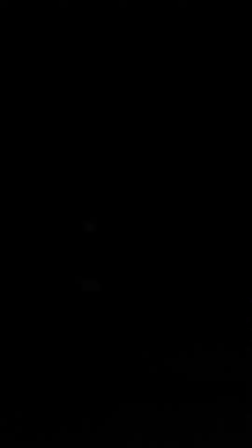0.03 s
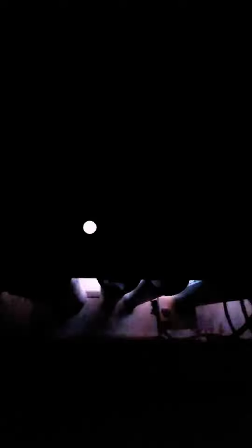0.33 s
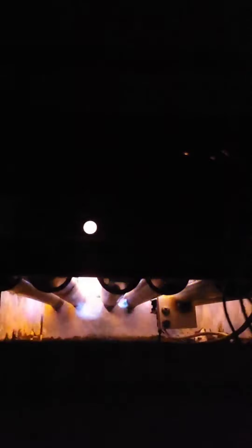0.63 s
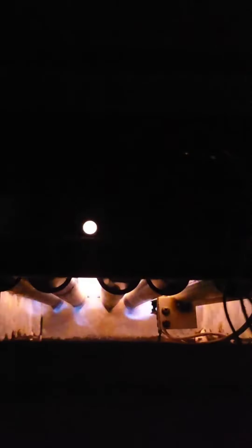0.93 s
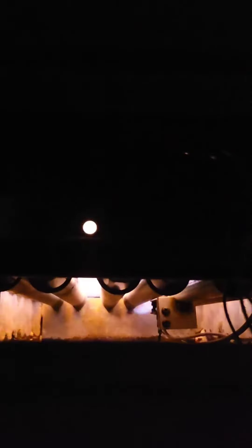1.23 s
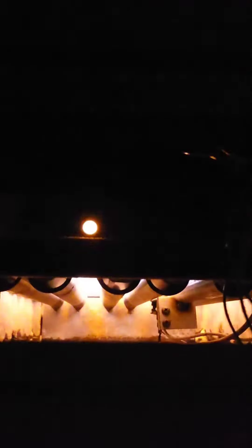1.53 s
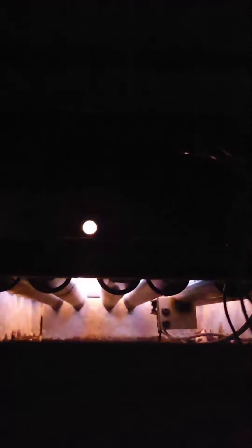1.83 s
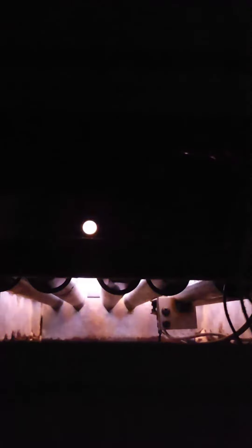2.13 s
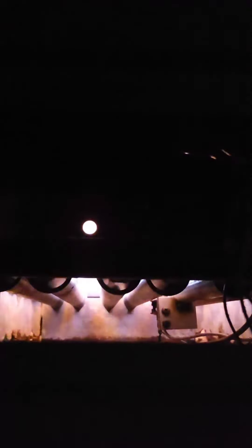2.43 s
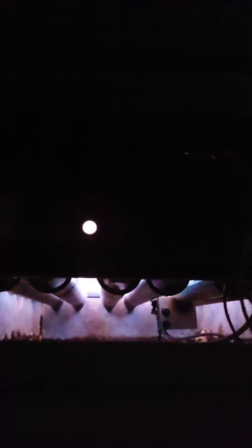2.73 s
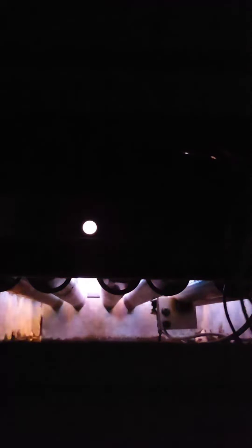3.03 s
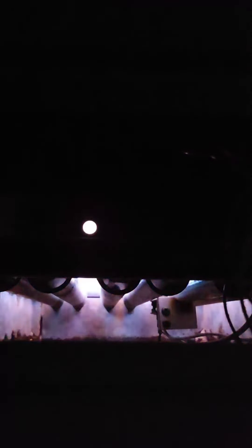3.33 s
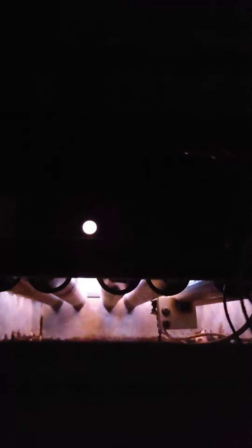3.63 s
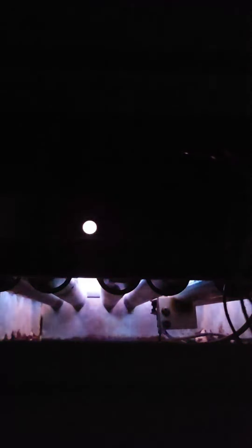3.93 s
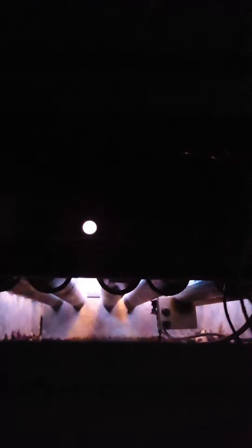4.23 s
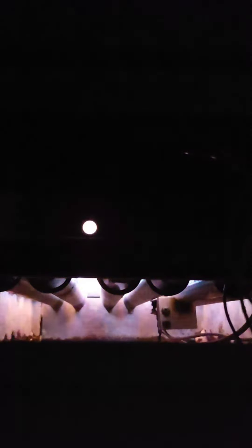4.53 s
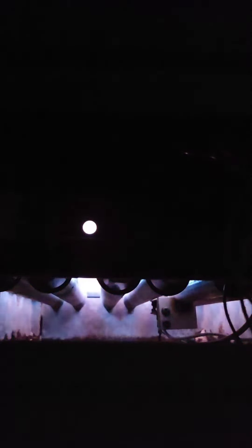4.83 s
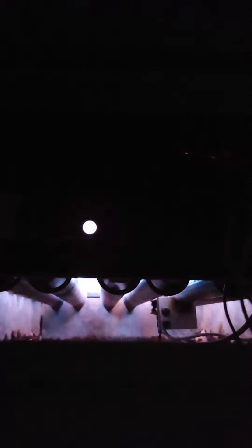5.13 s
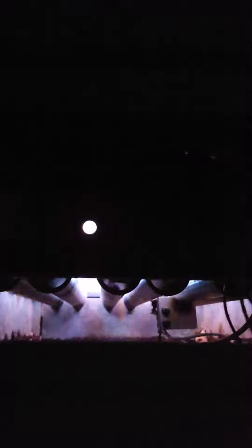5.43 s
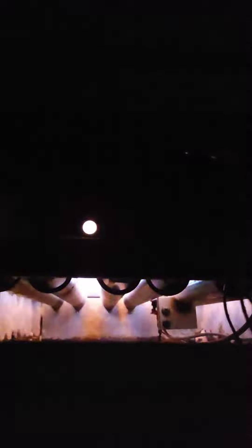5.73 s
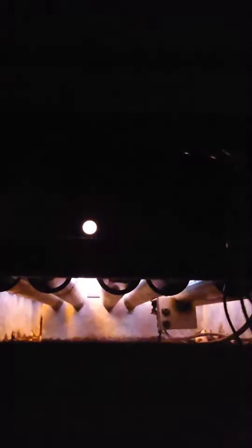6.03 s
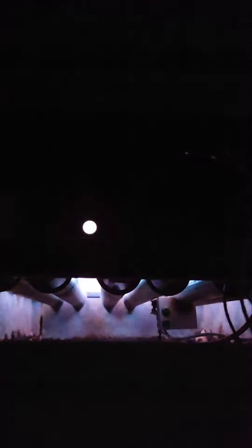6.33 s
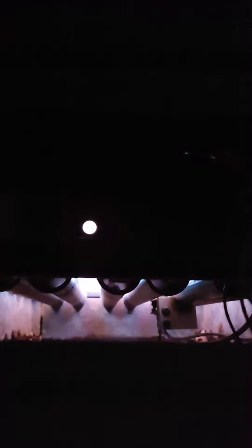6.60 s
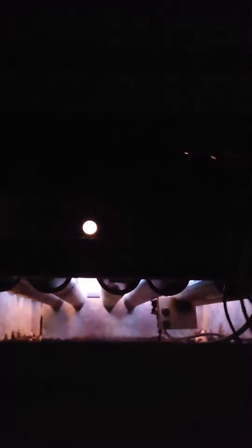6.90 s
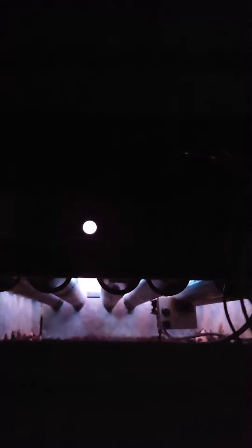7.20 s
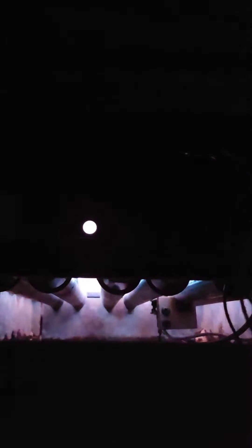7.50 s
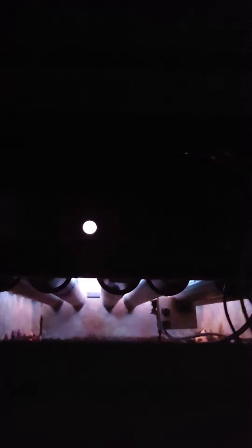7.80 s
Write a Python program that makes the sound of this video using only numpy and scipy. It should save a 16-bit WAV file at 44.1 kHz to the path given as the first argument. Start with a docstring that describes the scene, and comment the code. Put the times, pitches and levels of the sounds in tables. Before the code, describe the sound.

Close to the burners inside a gas boiler, a crisp valve click starts a thin hiss. The gas lights with a soft, low puff amid a few small, bright igniter ticks. After a short dip, the fire builds to a deep, even roar that flutters and now and then swells for a moment. The faint hiss of the jets and a very faint, high valve buzz carry on throughout.

```python
"""A gas boiler's flame catches with a soft whoomph, sinks, then settles to a low fluttering roar.
Turbulent combustion is a broadband source, filtered by the resonances of firebox and flue.
Just before it lights, a solenoid valve snaps open and buzzes at twice the mains frequency, and gas
hisses from the jets. The igniter ticks five times as the flame takes hold.
A draught murmurs in the flue. All is heard close to the open burner tray."""
import sys
import numpy as np
from scipy import signal
from scipy.fft import rfft, irfft
from scipy.io import wavfile
from scipy.ndimage import uniform_filter1d

SR = 44100
rng = np.random.default_rng(int(sys.argv[2]) if len(sys.argv) > 2 else 0)


def put_to_file(sound):
    """Save the sound as 16-bit audio at rate SR, in the file named by the first command-line argument."""
    columns = np.atleast_2d(sound).T  # one column per channel
    safe = np.clip(columns, -1, 1)
    whole_steps = np.round(safe * 32767)
    wavfile.write(sys.argv[1], SR, whole_steps.astype(np.int16))


N = 346626
T = np.arange(N) / SR
HZ = np.fft.rfftfreq(N, 1 / SR)


# Flame strength, small at first and growing as the flue draws: t/s, relative level/dB
FLAME_GROWTH = [(.22, -24), (.35, -18), (.6, -6), (.92, -13.5), (1.1, -8), (1.25, -3), (2.0, -0.4),
                (3.1, 0.5), (3.9, 1.2), (4.55, -0.6), (5.75, -1), (6.5, 0), (7.1, -0.5), (7.86, -0.5)]
# Spectrum of combustion noise: f/Hz, relative level/dB
COMBUSTION_SPECTRUM = [(20, -40), (35, -34), (54, -11), (100, -8.5), (168, -4.5), (200, -21), (260, -27.5),
                       (400, -25.5), (440, -37), (520, -40), (950, -46.5), (1030, -46.5), (1900, -50),
                       (3200, -70.5)]
# Level difference of the flame, left minus right: f/Hz, level/dB
FLAME_BALANCE = [(58, 1), (80, 6), (110, 2), (160, 0.5), (185, 10), (215, -2), (245, 12.5), (272, -9),
                 (320, 1), (600, 1.5), (900, 0.5), (1400, -8), (2500, 1.5)]
# Coherence of left and right: f/Hz, coherence/1
FLAME_COHERENCE = [(30, 1), (60, 0.98), (160, .99), (215, 0.97), (280, 1), (450, 0.84), (540, 0.59),
                   (700, 0.82), (1200, 1), (2500, 1)]
# Phase lead of left over right: f/Hz, phase/rad
FLAME_PHASE = [(40, .25), (110, 0.27), (200, 0.37), (260, 0.098), (400, 0.44), (650, 0.71), (1030, 1.5),
               (1300, 2.57), (1720, 5.12)]
def flame(lights_s=0.222, onset_s=0.027, swell_s=0.14, rumble_db=-28.5, roar_db=-21, rush_db=-35):
    """Turbulent combustion drives the firebox; each band grows as a power of the flame's strength."""
    balance_db = spectrum(FLAME_BALANCE) * np.array([[0.5], [-0.5]])
    fire_db = spectrum(COMBUSTION_SPECTRUM) + firebox() + balance_db
    fire = rfft(noise(fire_db, spectrum(FLAME_COHERENCE), spectrum(FLAME_PHASE)))
    below_roar = 1 / (1 + (HZ / 95) ** 16)
    below_rush = 1 / (1 + (HZ / 215) ** 16)
    burning = envelope(FLAME_GROWTH)
    rumble_flare, roar_flare = np.sqrt(flares())
    # steady burning and flare-ups add in power
    rumble = np.hypot(amp(rumble_db) * burning ** 0.81, rumble_flare)
    roar = np.hypot(amp(roar_db) * burning ** 0.98, roar_flare)
    rush = np.hypot(amp(rush_db) * burning ** 0.68, amp(-15) * rumble_flare)
    out = hum()
    for passband, gain in (below_roar, rumble), (below_rush - below_roar, roar), (1 - below_rush, rush):
        band = irfft(fire * passband, N)
        # dividing by the running rms keeps the fast flutter; the slow swell follows the flame
        out += gain * band / running_rms(band, swell_s)
    return out * np.clip((T - lights_s) / onset_s, 0, 1)


# Flare-ups, as the burners catch in turn and now and then later:
# t/s, hold/s, rumble level/dB, roar level/dB
FLARE_UPS = [(0.244, 0.011, -34, -42), (0.38, .02, -50, -26), (0.448, .03, -21, -21.5),
             (0.543, 0.05, -19, -19.5), (0.707, 0.014, -27.5, -15), (1.228, 0.026, -29, -20.5),
             (1.814, 0.014, -47, -16.5), (2.29, 0.082, -39, -19), (2.7, 0.026, -42, -16),
             (3.088, 0.15, -23.5, -25.5), (3.523, 0.28, -26, -24.5), (4.176, 0.12, -30, -19),
             (5.035, 0.074, -26, -18.5), (6.226, 0.17, -32, -19)]
def flares(rise_s=0.023, fall_s=0.022):
    """Incoherent sources add in power: the flare-ups' total, for the rumble and for the roar."""
    return sum(burst(s, hold_s, rise_s, fall_s, [[rumble_db], [roar_db]]) ** 2
               for s, hold_s, rumble_db, roar_db in FLARE_UPS)


# Resonances of firebox and flue: f/Hz, width/Hz, level/dB
FIREBOX_MODES = [(55.3, 11, 4), (115, 21.7, 4.5), (143.9, 25.2, 7.5), (272.4, 12.6, 12.5), (298.2, 18.2, 9),
                 (325.6, 15.5, 6.5), (361, 11.6, 9), (400.5, 34, 7), (463, 40, 8.5), (593, 29, 8.5),
                 (716.5, 65, 9.5), (822.5, 44, 8.5), (908, 141, 10), (1157, 98, 7), (1722, 44, 6.5)]
# Interference in the casing, mostly nulls: f/Hz, width/Hz, level/dB
CASING_NULLS = [(285.6, 4, -15), (495, 5.1, 2), (530, 31, -21), (790, 13, -13), (1043, 36, -14),
                (1300, 44, -3), (1610, 120, -6.5)]
def firebox():
    """Cavity response in dB: standing waves give peaks, destructive interference gives dips."""
    return bells(FIREBOX_MODES) + bells(CASING_NULLS)


# The firebox resonance that hums: f/Hz, width/Hz, level/dB
HUM_MODE = [(267, 75, 58)]
def hum():
    """A noise-driven resonance hums while the firebox is cold and fades as it warms."""
    gain = burst(s=0.58, hold_s=2.8, rise_s=0.078, fall_s=2.9, db=-40.5)
    hum_db = bells(HUM_MODE) - 40 * np.log10(1 + HZ / 500)
    return gain * noise(hum_db, coherence=1) * amp([[-1.5], [1.5]])


# Spectrum of the flame front: f/Hz, relative level/dB
FRONT_SPECTRUM = [(250, -13), (420, 2.5), (600, -3.5), (900, -10), (1100, -5.5), (1600, -14), (2100, -31),
                  (4000, -40)]
# Spectrum of the puff: f/Hz, relative level/dB
PUFF_SPECTRUM = [(120, -34), (195, 1), (240, 11), (275, -1), (320, -18), (500, -52)]
def whoomph():
    """Deflagration: a hollow flare runs along the burners and the gathered gas burns in one low puff."""
    lead = spectrum(FLAME_PHASE)
    front = noise(spectrum(FRONT_SPECTRUM) + firebox(), coherence=0.84, lead=lead)
    front *= burst(s=0.41, hold_s=0.08, rise_s=0.05, fall_s=0.08, db=-39)
    puff = noise(spectrum(PUFF_SPECTRUM), coherence=0.89, lead=lead)
    puff *= burst(s=0.458, hold_s=0.15, rise_s=0.052, fall_s=0.05, db=-27.5)
    return front + puff


# Flow through the open valve: t/s, jet hiss level/dB, drawn air level/dB
GAS_FLOW = [(.14, -48, -54), (.21, -51.5, -63), (.31, -44, -60.5), (.5, -42, -49), (.82, -45.5, -57),
            (1.3, -43.5, -50.5), (1.9, -43, -49.5), (4.6, -45, -52.5), (7.86, -44, -52)]
# Spectrum of the jets: f/Hz, relative level/dB
JET_SPECTRUM = [(1500, -24), (3200, -9), (4800, -3.5), (5400, 0), (6500, 1.5), (8300, -2), (9000, -1.5),
                (10600, -1.5), (11900, 3), (13000, 1), (14500, 0.5), (15500, -5.5)]
# Thin sizzle at the top of the hiss: f/Hz, width/Hz, level/dB
SIZZLE_PEAK = [(15600, 1100, 40)]
# Spectrum of the drawn air: f/Hz, relative level/dB
AIR_SPECTRUM = [(900, -10), (1500, 0), (2000, -2.1), (2600, 1.5), (3100, -3.5), (4500, -11), (7000, -47)]
# Resonances of the burner tubes: f/Hz, width/Hz, level/dB
TUBE_MODES = [(2016, 35, 6), (2300, 83, 3), (2733, 90, 7.5), (3640, 210, 5.1), (4110, 180, 8.4)]
def jets(fill_s=0.027, ripple_db=2.26, ripple_hz=60, whistle_hz=2040, waver_hz=1.67):
    """Turbulent gas jets hiss and entrain air into the burner tubes, one of which whistles faintly."""
    # reflections in the casing comb the hiss, differently on each side
    comb_bins = int(ripple_hz * N / SR) + 1
    comb_db = ripple_db * unit_rms(uniform_filter1d(rng.standard_normal((2, len(HZ))), comb_bins))
    lead = 2 * np.pi * HZ * 0.000338  # the right side hears it 0.338 ms later
    opened = np.clip((T - PLUNGER_IMPACTS[-1][0]) / fill_s, 0, 1)
    gas = opened * envelope(GAS_FLOW)
    draw = opened * envelope(GAS_FLOW, column=2)
    hiss = gas * noise(spectrum(JET_SPECTRUM) + comb_db, coherence=0.35, lead=lead)
    sizzle_gain = amp(-12 + 7 * np.exp(-T / 0.9)) * gas  # strongest as the gas starts
    sizzle = sizzle_gain * noise(bells(SIZZLE_PEAK) + comb_db, coherence=0.35, lead=lead)
    drift = unit_rms(uniform_filter1d(rng.standard_normal(N), size=3000))
    phase = 2 * np.pi * np.cumsum(whistle_hz + waver_hz * drift) / SR
    whistle = amp(-69.5) * unit_rms(np.sin(phase)) * unit_rms(draw)
    air = draw * noise(spectrum(AIR_SPECTRUM) + bells(TUBE_MODES) + comb_db, coherence=0.6, lead=lead)
    return shadow(hiss + sizzle, right_db=-25.5) + shadow(air, right_db=-21.5) + whistle


# The plunger lifts, then seats: t/s, relative level/dB, T60/s
PLUNGER_IMPACTS = [(0.0934, -6, 0.077), (0.1005, 5.5, 0.062)]
# Spectrum of the click: f/Hz, relative level/dB
CLICK_SPECTRUM = [(300, -18), (900, -16), (1300, -22), (2300, -19), (3300, -19), (4700, -7), (5600, 1),
                  (7900, 4), (9500, -3), (12500, -2), (15500, -2)]
# Modes of the valve body: f/Hz, width/Hz, level/dB
VALVE_MODES = [(2170, 280, 18), (2730, 220, 15), (5200, 220, 6), (6130, 210, 8), (7800, 330, 7),
               (9500, 260, 8), (10700, 240, 8), (11800, 470, 6), (12420, 240, 6), (13600, 240, 3)]
# Spectrum of the panels' dull ring: f/Hz, relative level/dB
PANEL_SPECTRUM = [(120, -18), (220, -5), (380, 3), (700, 0.5), (1100, -9.5), (1600, -11.5), (2300, -10),
                  (4000, -17.5)]
def valve(force_db=-7.5, room_db=-19, thud_db=-17.5):
    """Impact excitation: the plunger rings the valve body, the room reverberates and the panels thud."""
    snap, thud = np.zeros((2, 2, N))
    for s, db, t60 in PLUNGER_IMPACTS:
        add(snap, s, amp(db + force_db) * knock(tail_db=9.5, t60=t60))
    snap = shadow(snap, right_db=-10)
    room = signal.oaconvolve(snap[:1], knock(tail_db=7, t60=0.22), axes=1)[:, :N] / 2
    click = colour(snap + amp(room_db) * room, spectrum(CLICK_SPECTRUM) + bells(VALVE_MODES))
    add(thud, PLUNGER_IMPACTS[-1][0], amp(thud_db) * knock(tail_db=9, t60=0.18, size=24000))
    return click + colour(thud, spectrum(PANEL_SPECTRUM))


# Igniter discharges: t/s, relative level/dB
SPARK_TICKS = [(0.2928, -10), (.5685, -17), (0.8326, -12), (1.1245, -10.5), (1.3764, -13)]
# Spectrum of a spark: f/Hz, relative level/dB
SPARK_SPECTRUM = [(1500, -24), (4000, -13.5), (6000, -7), (9500, -9), (12500, 3), (15500, -1.5)]
def igniter(snap_db=2.5):
    """Each spark is an impulsive source: a tiny bright snap followed by brief reflections."""
    snaps = np.zeros((2, N))
    for s, db in SPARK_TICKS:
        add(snaps, s, amp(db + snap_db) * knock(tail_db=0, t60=0.035))
    return shadow(colour(snaps, spectrum(SPARK_SPECTRUM)), right_db=-16)


# Spectrum of the armature's chatter: f/Hz, relative level/dB
CHATTER_SPECTRUM = [(3000, -40), (5600, -8), (6700, -7), (7100, 14), (8400, 13), (9200, -9), (10100, -25),
                    (11500, -20), (12800, -2), (14300, -2), (15500, -3.5)]
def solenoid(chatter_hz=119.975, buzz_db=-55, force_spread=0.19, bounce_s=0.0015, bounce_gain=0.16):
    """Forced vibration: the armature strikes and bounces at each magnetic pull, two per mains cycle."""
    first_pull = np.ceil(PLUNGER_IMPACTS[-1][0] * chatter_hz)
    times = np.arange(first_pull, T[-1] * chatter_hz - 1) / chatter_hz
    force = 1 + force_spread * rng.standard_normal((len(times), 1))
    strikes = np.zeros(N)
    for delay, gain in (0, 1), (bounce_s, bounce_gain):
        position = (times[:, None] + delay) * SR
        near = position.astype(int) + np.arange(-10, 10)
        strikes[near] += gain * force * np.sinc(near - position)  # pulses fall between samples
    ringing = signal.oaconvolve(strikes[None], knock(tail_db=0, t60=0.045), axes=1)[:, :N]
    buzz = colour(ringing, spectrum(CHATTER_SPECTRUM))
    return shadow(amp(buzz_db) * unit_rms(buzz), right_db=-10)


# Spectrum of the flue draught: f/Hz, relative level/dB
DRAUGHT_SPECTRUM = [(25, -29), (70, -8.5), (110, 0.5), (135, -3.5), (175, -12), (250, -13), (320, -17.5),
                    (560, -21.5), (720, -29.5), (1100, -29.5), (1450, -46), (3000, -55), (12000, -42.5)]
def draught(db=-39):
    """Flow noise: air murmurs through the flue even with the burner off."""
    return amp(db) * noise(spectrum(DRAUGHT_SPECTRUM), coherence=1, lead=spectrum(FLAME_PHASE))


def amp(db):
    """Amplitude ratio of a level in decibels."""
    return 10 ** (np.asarray(db) / 20)


def unit_rms(x):
    """Normalisation to an rms of 1."""
    return x / np.sqrt(np.mean(x ** 2) + 1e-20)


def running_rms(x, width_s):
    """Short-time rms of the mean of both sides, under a Hann window width_s wide at half height."""
    window = np.hanning(int(2 * width_s * SR))
    power = signal.fftconvolve(x.mean(0) ** 2, window / window.sum(), "same")
    return np.sqrt(abs(power) + 1e-20)


def spectrum(points):
    """Interpolation of a frequency table on a logarithmic axis."""
    f, value = np.transpose(points)
    return np.interp(np.log(HZ + 1), np.log(f + 1), value)


def envelope(rows, column=1):
    """Amplitude envelope from one dB column of a time table."""
    columns = np.transpose(rows)
    return amp(np.interp(T, columns[0], columns[column]))


def burst(s, hold_s, rise_s, fall_s, db):
    """Exponential growth to db at time s, a hold, then exponential decay."""
    return amp(db) * np.exp(-np.maximum(s - T, 0) / rise_s - np.maximum(T - s - hold_s, 0) / fall_s)


def bells(modes):
    """Resonance peaks and dips as Gaussian curves in dB."""
    return sum(db * np.exp(-np.log(2) * (2 * (HZ - hz) / width) ** 2) for hz, width, db in modes)


def noise(shape_db, coherence, lead=0):
    """Partially coherent stereo noise of unit rms; the left side leads by lead radians."""
    left, independent = rfft(rng.standard_normal((2, N)))
    coherence = np.clip(coherence, 0, 1)
    right = (coherence * left + np.sqrt(1 - coherence ** 2) * independent) * np.exp(-1j * lead)
    return unit_rms(irfft(np.array([left, right]) * amp(shape_db), N))


def colour(x, shape_db):
    """Minimum-phase filter of unit power gain: causality keeps attacks sharp."""
    cepstrum = irfft(np.log(unit_rms(amp(shape_db))), N)
    cepstrum[1:N // 2] *= 2
    cepstrum[N // 2 + 1:] = 0
    return irfft(rfft(x) * np.exp(rfft(cepstrum)), N)


def shadow(x, right_db):
    """Acoustic shadow: the left side faces the burner, the right is shielded by a fixed gain."""
    return x * amp([[0], [right_db]])


def knock(tail_db, t60, size=12000):
    """Impulse response: a direct pulse, then dense reflections with tail_db of its energy."""
    tail = rng.standard_normal((2, size)) * np.exp(-np.log(1000) * T[:size] / t60)
    sound = amp(tail_db) * tail / np.linalg.norm(tail, axis=1, keepdims=True)
    sound[0, 0] += 1
    sound[1, 14] += 1  # reaches the right a third of a millisecond later
    return sound


def add(mix, s, sound):
    """Superposes a stereo sound on the mix at time s."""
    part = mix[:, max(round(s * SR), 0):][:, :sound.shape[1]]
    part += sound[:, :part.shape[1]]


def scene():
    """Linear superposition of flue, valve, gas, sparks and fire."""
    return draught() + valve() + solenoid() + jets() + igniter() + whoomph() + flame()


def record(dry):
    """Band limiting by a steep linear-phase low-pass filter."""
    lowpass = signal.firwin(1023, cutoff=15810, window=("kaiser", 9), fs=SR)
    return signal.oaconvolve(dry, lowpass[None], "same", axes=1)


dry = scene()
out = record(dry)
put_to_file(out)
```